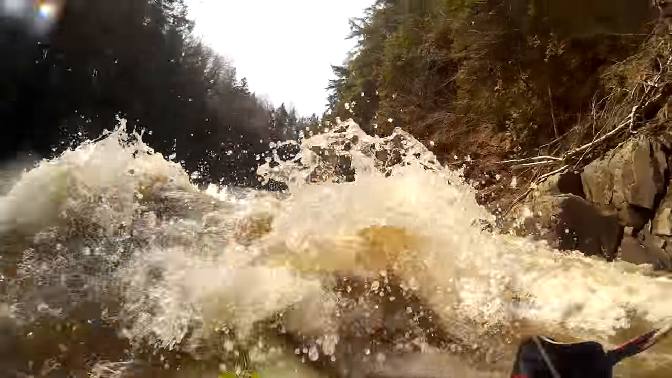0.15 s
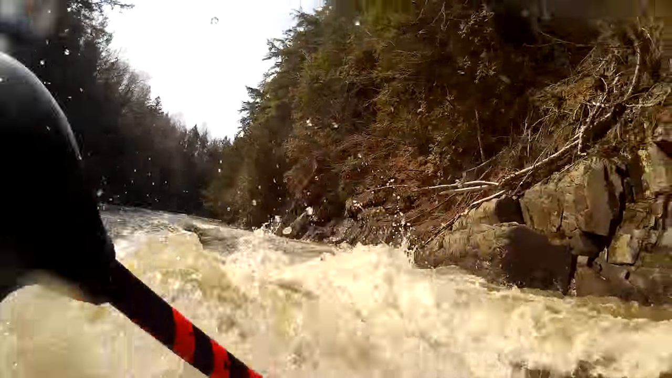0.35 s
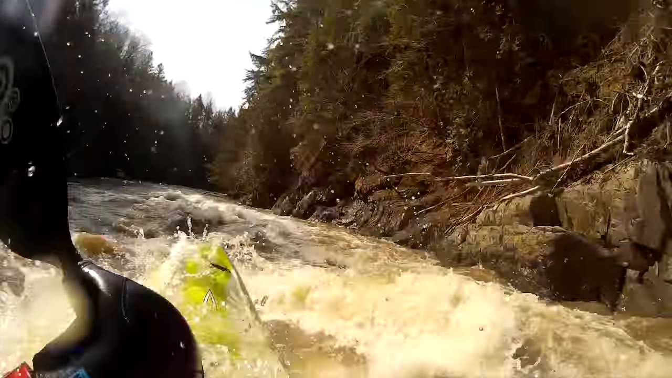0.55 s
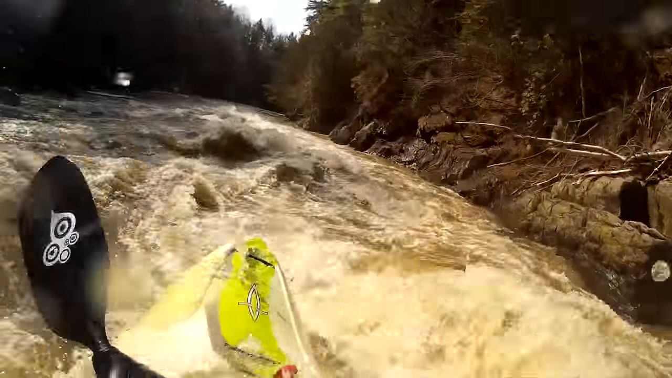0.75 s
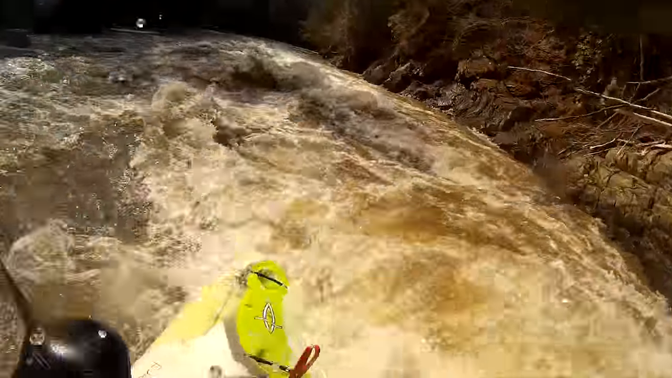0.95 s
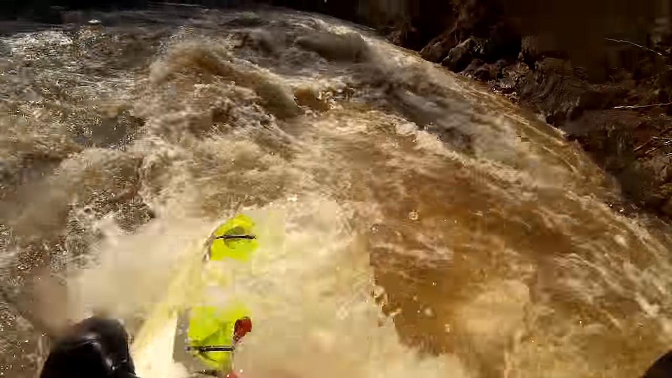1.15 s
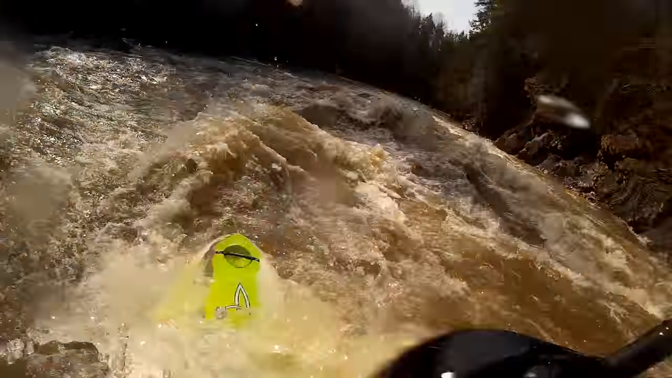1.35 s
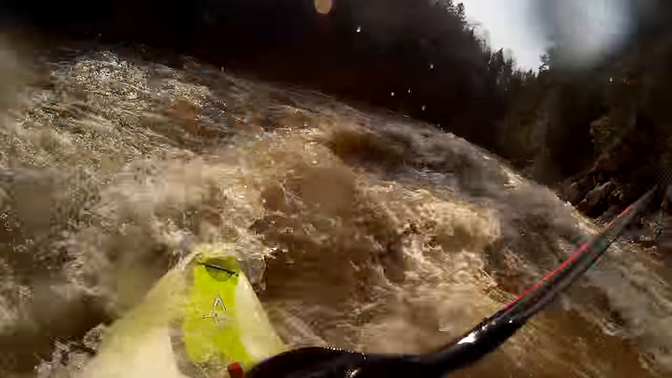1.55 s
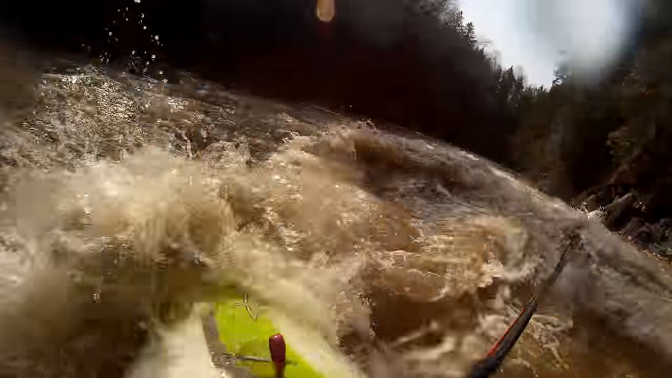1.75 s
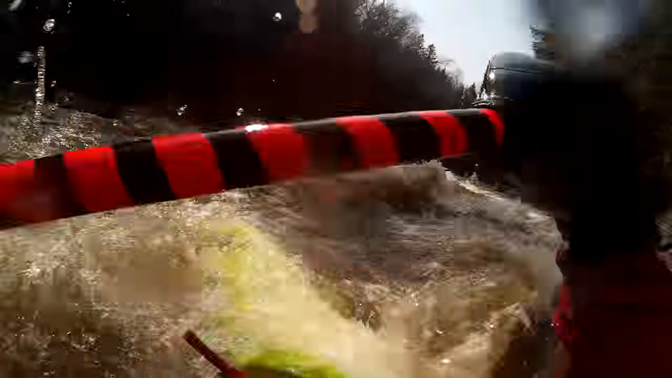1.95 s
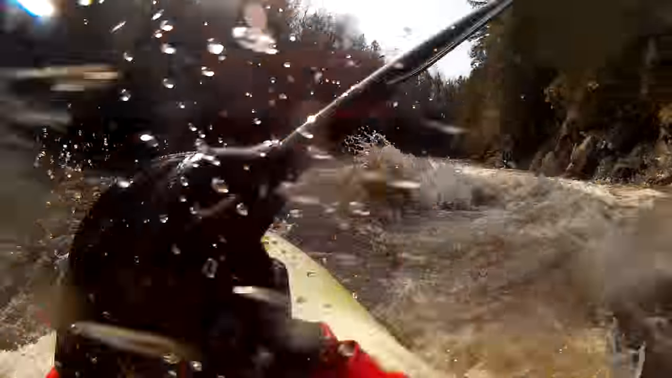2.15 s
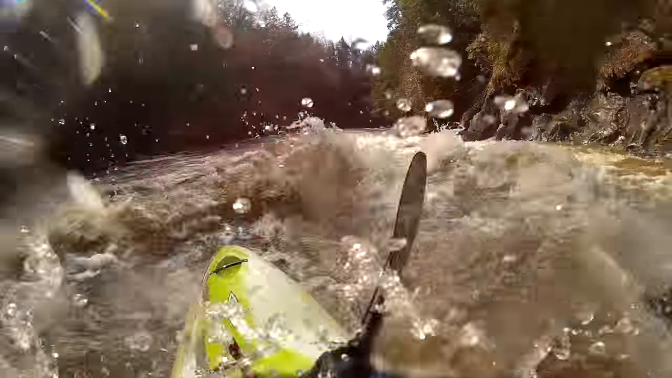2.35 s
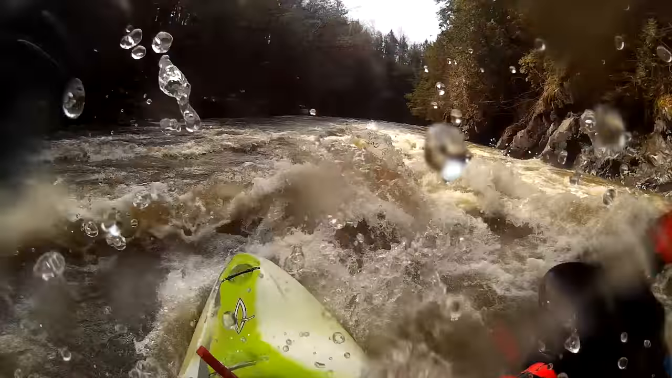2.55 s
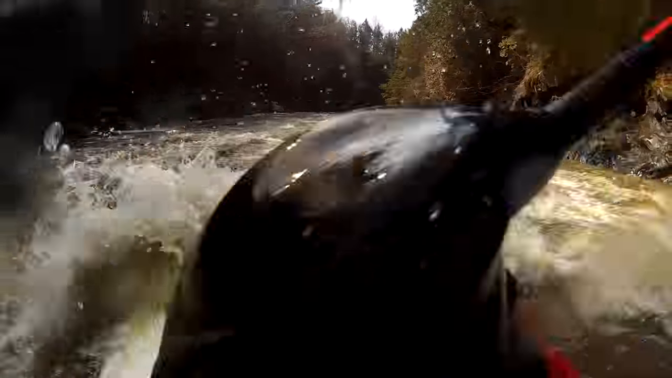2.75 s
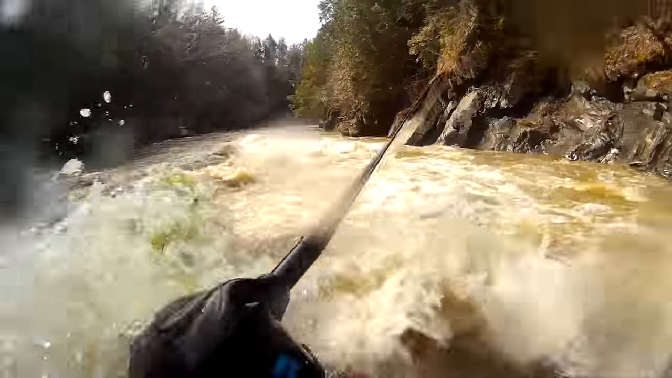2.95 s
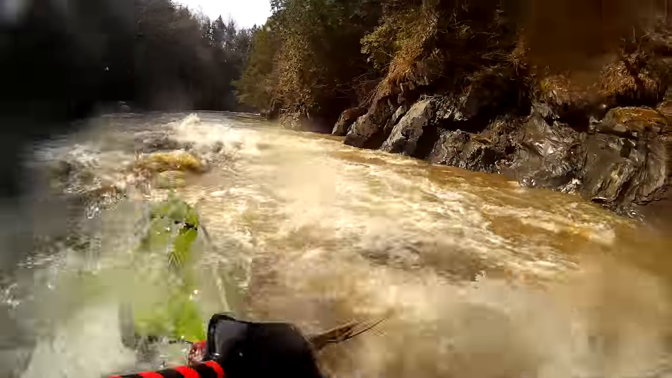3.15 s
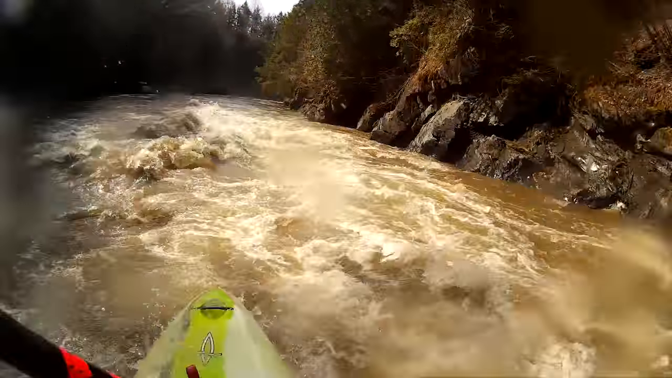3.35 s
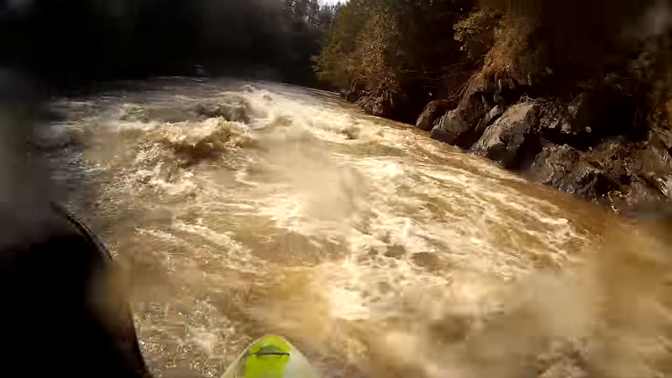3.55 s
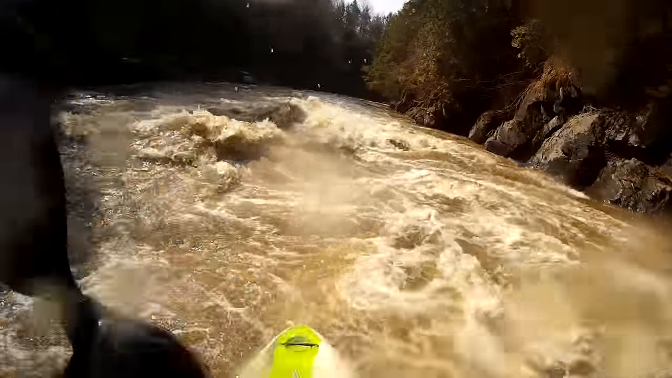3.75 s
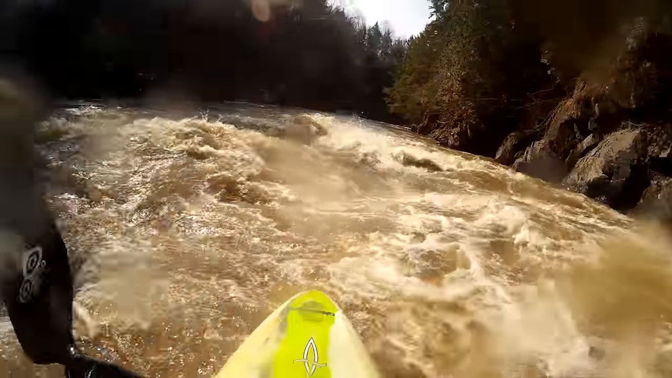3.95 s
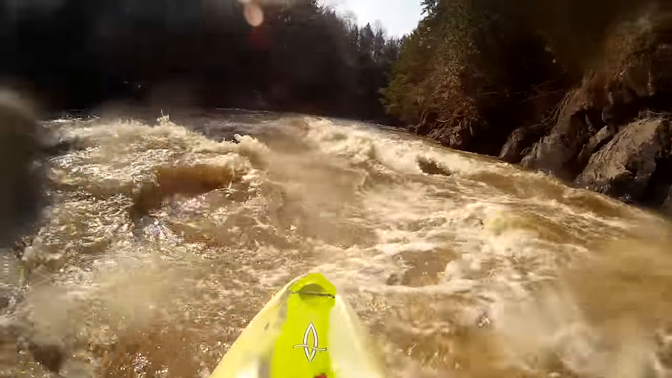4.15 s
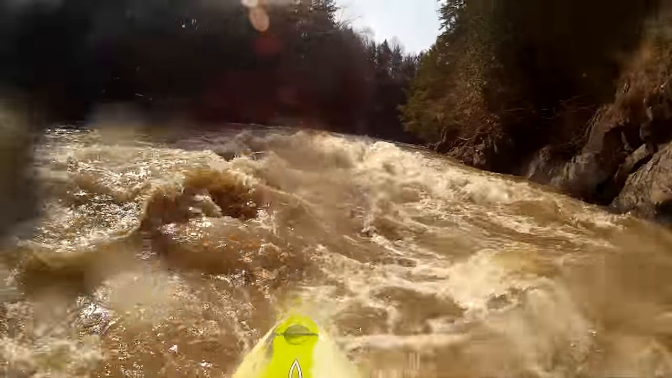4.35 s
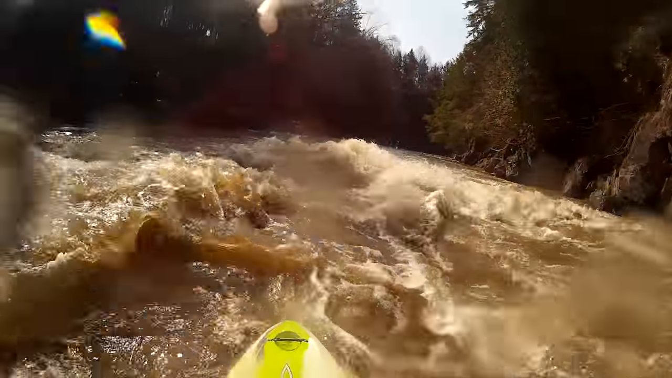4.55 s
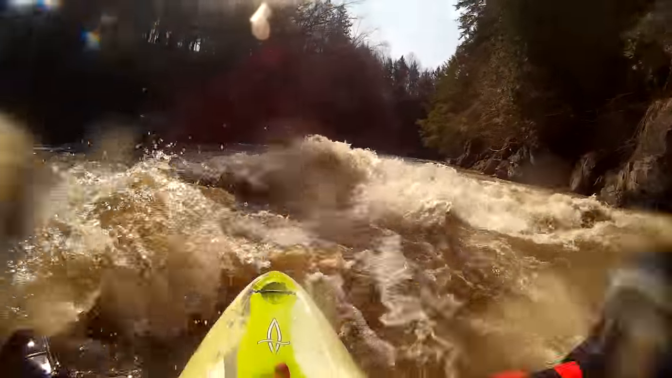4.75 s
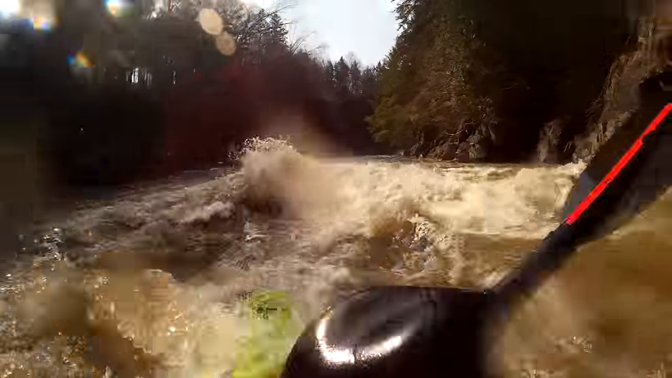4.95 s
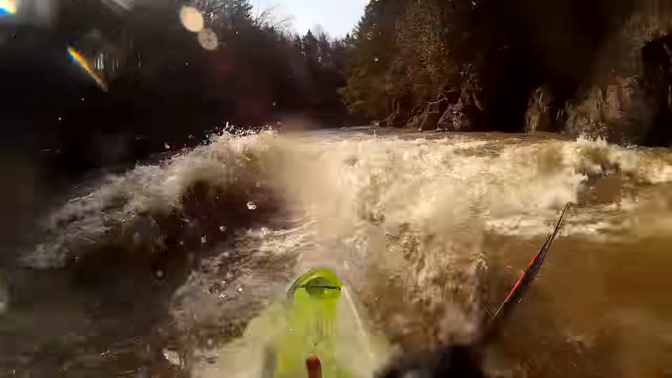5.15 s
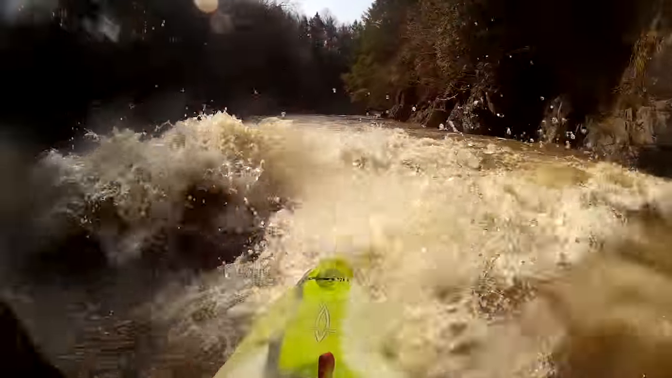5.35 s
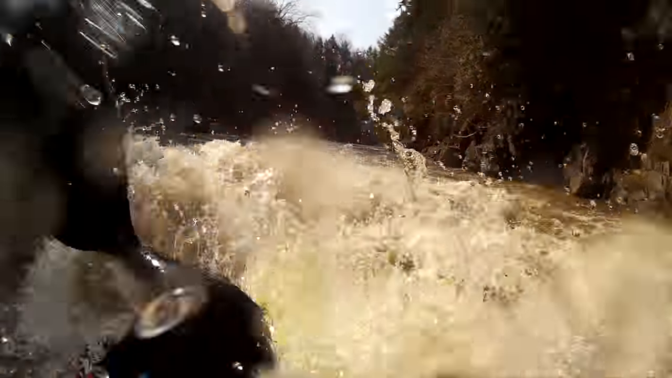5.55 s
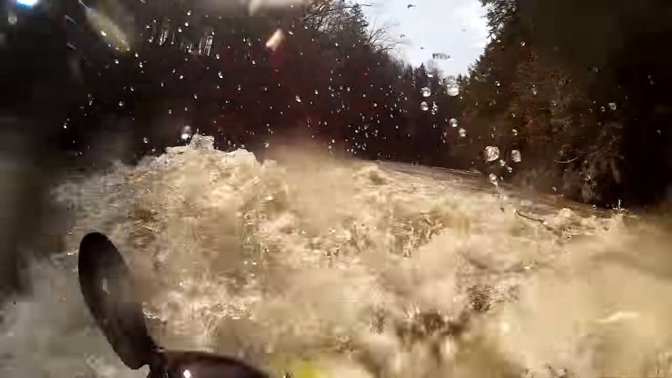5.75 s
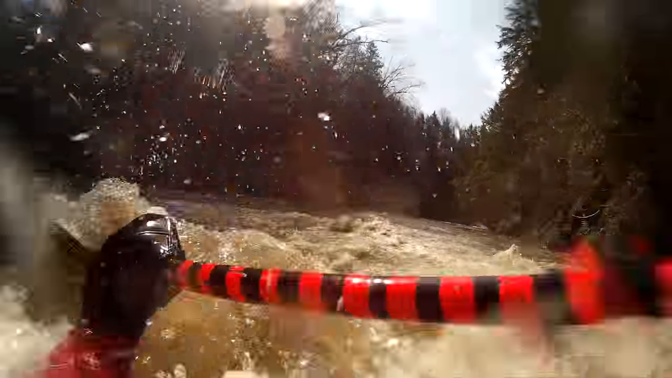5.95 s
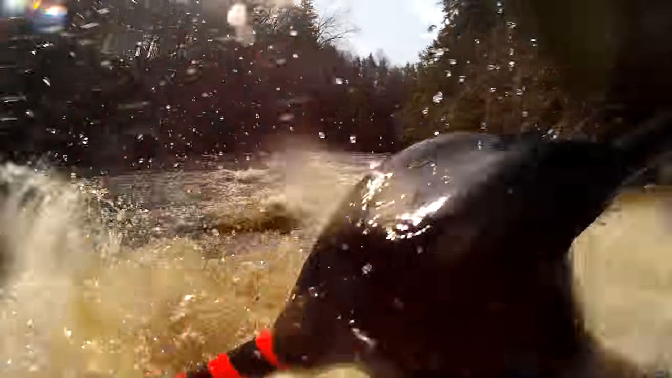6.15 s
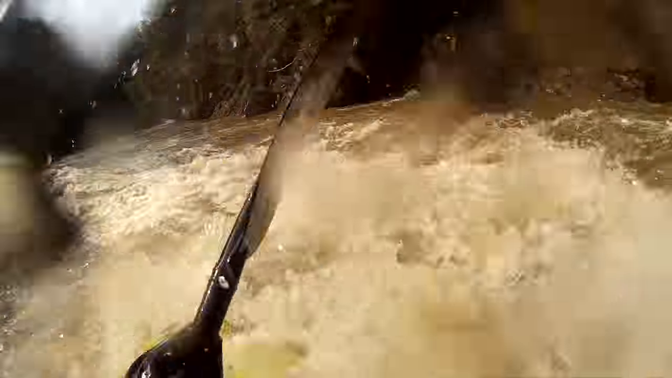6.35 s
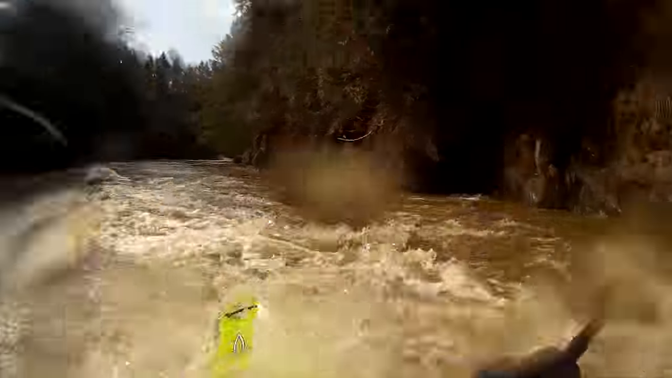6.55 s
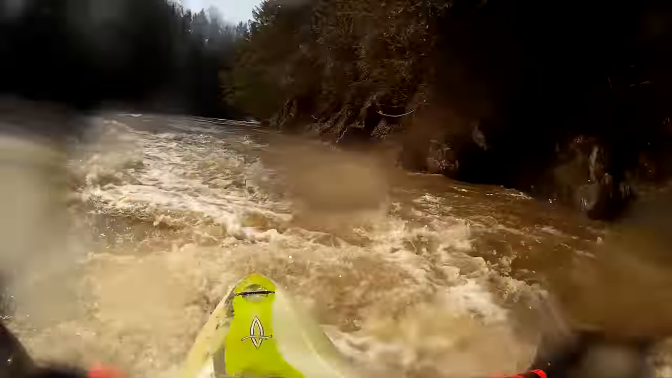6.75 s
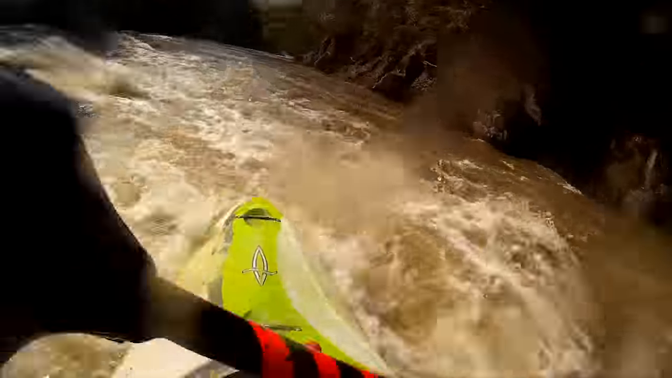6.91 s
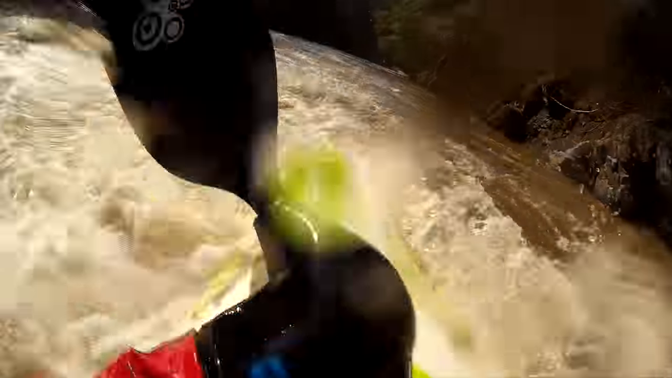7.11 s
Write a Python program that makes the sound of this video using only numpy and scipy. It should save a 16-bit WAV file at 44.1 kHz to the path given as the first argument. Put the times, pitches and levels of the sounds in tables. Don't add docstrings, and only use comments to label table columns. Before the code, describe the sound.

Dull rushing whitewater surges around a kayaker's helmet camera while its plastic case raps, creaks and clunks, and splashes tick and slap against it.

```python
import sys
import numpy as np
from scipy import signal
from scipy.io import wavfile
from scipy.ndimage import uniform_filter1d

SR = 44100
rng = np.random.default_rng(int(sys.argv[2]) if len(sys.argv) > 2 else 0)


def nominal_scale(level):
    x = np.asarray(level, float) / 20
    return 10 ** x


def persist_wave(psi):
    counts = np.round(np.clip(psi, -1, 1) * 32767).astype(np.int16)
    wavfile.write(sys.argv[1], SR, np.atleast_2d(counts).T)


N = 321048


def evened(x):
    return x / np.sqrt(np.mean(x ** 2) + 1e-20)


def read(points, hz):
    f, value = np.transpose(points)
    return np.interp(np.log(hz + 1), np.log(f + 1), value)


def add(mix, start_s, sound):
    part = mix[round(start_s * SR):][:len(sound)]
    part += sound[:len(part)]


def muffled(x, hz):
    return signal.sosfilt(signal.butter(4, min(hz, 9000), fs=SR, output="sos"), x)


def passed(x, low_hz, high_hz):
    return signal.sosfilt(signal.butter(2, [low_hz, high_hz], "band", fs=SR, output="sos"), x)


def shell_ring(t, modes):
    return sum(nominal_scale(db) * np.exp(-np.pi * width_hz * t) * np.sin(2 * np.pi * hz * t)
               for hz, width_hz, db in modes)


def noise_of(points):
    return lambda hz: nominal_scale(read(points, hz))


def water(colour, patchy_db, flicker_db, size=1024):
    hop = size // 4
    frames, hz = N // hop + 5, np.fft.rfftfreq(size, 1 / SR)
    real, imag, patches = rng.standard_normal((frames, len(hz), 3)).T
    patches = uniform_filter1d(patches, size=10, axis=0)
    patches = evened(uniform_filter1d(patches, size=8, axis=1))
    flicker = evened(uniform_filter1d(rng.standard_normal(frames), size=4))
    level = nominal_scale(patchy_db * patches + flicker_db * flicker)
    z = (real + 1j * imag) * colour(hz)[:, None] * level
    return evened(signal.istft(z, nperseg=size, noverlap=size - hop)[1][:N])


# (frequency [Hz], density [dB per Hz])
HISS = [(2000, -14), (5000, 2.5), (10000, 2), (16000, 0.5)]


def preamp_hiss():
    return nominal_scale(-73.5) * water(noise_of(HISS), patchy_db=0.1, flicker_db=1.0)


# (frequency [Hz], density [dB per Hz])
SHELL = [(90, -18), (150, -2.5), (250, -2.5), (650, -8.5), (900, -7.5), (1350, -18.5), (1900, -19.5),
         (2500, -22.5), (3100, -37), (3400, -54.5)]
# (frequency [Hz], width [Hz], level [dB])
SHELL_MODES = [(1176, 59, -5.5), (1500, 66, -6), (1220, 32, -19.5), (1707, 147, -12.5), (2122, 112, -14)]


def through_shell(hz):
    peaks = sum(nominal_scale(2 * db) / (1 + (2 * (hz - f) / width_hz) ** 2) for f, width_hz, db in SHELL_MODES)
    peaks = peaks * nominal_scale(2 * read([(2300, 2), (3200, -8.5)], hz))
    return np.sqrt(nominal_scale(2 * read(SHELL, hz)) + peaks)


# (time [s], roar level [dB])
FLOW = [(0.0, -59.5), (0.18, -55), (0.75, -56.5), (1.0, -58.5), (1.65, -57), (2.21, -55.5), (2.3, -63.5),
        (2.5, -60), (3.2, -60.5), (3.75, -64), (4.12, -63), (4.4, -62), (4.9, -60.5), (5.6, -56.5),
        (5.92, -54), (6.4, -53), (6.6, -59), (7.28, -62)]
# (time [s], lift [dB], rise and fall [s])
SPLASHES = [(.3, 3.5, 0.074), (.46, 6.5, 0.077), (.55, 8.5, .08), (1.17, 3, 0.14), (1.37, 1, 0.062),
            (1.7, 2.5, .09), (2.04, 5.5, 0.042), (2.5, 3.5, 0.42), (3.18, 2, 0.26), (4.98, 2.5, 0.12),
            (5.36, 0.5, 0.17), (5.76, 2.5, 0.17), (6.06, 2.5, 0.14), (6.19, 2, 0.11), (6.72, 2.5, 0.04),
            (7.03, 2, 0.12)]
# (time [s], rumble level [dB])
LURCHES = [(.3, -59), (.5, -46.5), (.64, -43), (1.14, -44), (1.4, -53), (1.56, -47), (1.7, -49),
           (1.97, -44.5), (2.1, -39), (2.22, -41), (2.6, -56), (3.08, -50.5), (3.5, -58), (3.94, -59),
           (5.15, -51.5), (5.55, -48), (5.88, -48.5), (6.19, -49), (6.4, -45), (6.66, -44.5), (7.1, -51)]
ROAR_SHARE, SPRAY_SHARE, SPRAY_DB = 0.94, 1.27, -13.5
LURCH_S, REST_DB = 0.067, -1


def swell():
    t = np.arange(0, N + 64, 64) / SR
    flow_db = np.interp(t, *np.transpose(FLOW))
    lift_db = sum(db * np.maximum(1 - abs(t - s) / span_s, 0) for s, db, span_s in SPLASHES)
    lurches = sum(nominal_scale(db) * np.exp(-.5 * ((t - s) / LURCH_S) ** 2) for s, db in LURCHES)
    roar_db = flow_db + ROAR_SHARE * lift_db
    spray_db = flow_db + SPRAY_DB + SPRAY_SHARE * lift_db
    rocking_db = 20 * np.log10(nominal_scale(flow_db + REST_DB) + lurches)
    return [np.interp(np.arange(N) / SR, t, db) for db in (roar_db, spray_db, rocking_db)]


# (frequency [Hz], density [dB per Hz])
SPRAY = [(2600, -5), (3300, -2.5), (3800, 6), (4300, 0.5), (5000, -12), (6000, -15), (7000, -41)]
# (frequency [Hz], density [dB per Hz])
FIZZ = [(4000, -21), (5500, 2.5), (7000, 0.5), (8300, 2), (10500, -7), (12500, -30)]
# (frequency [Hz], density [dB per Hz])
ROCKING = [(12, -27.5), (25, 13.5), (55, -16.5), (110, -3.5), (160, -12.5), (300, -64.5)]


def river():
    roar_db, spray_db, rocking_db = swell()
    roar = water(through_shell, patchy_db=1.5, flicker_db=0.65, size=512)
    deep = signal.oaconvolve(roar, signal.firwin(201, 1000, fs=SR), "same")
    far_db = -54.5 + 0.97 * (roar_db + 59.5)
    roar = nominal_scale(far_db) * deep + nominal_scale(roar_db + 10.5) * (roar - deep)
    spray = nominal_scale(spray_db + 2.6) * water(noise_of(SPRAY), patchy_db=0.5, flicker_db=-0.5, size=256)
    fizz_db = -73.5 + 1.1 * (spray_db + 61)
    fizz = nominal_scale(fizz_db) * water(noise_of(FIZZ), patchy_db=1.0, flicker_db=-2.5, size=256)
    rocking = nominal_scale(rocking_db - 1.5) * water(noise_of(ROCKING), patchy_db=1.5, flicker_db=1.2, size=2048)
    bursts = np.minimum(rng.exponential(1, N // 64 + 1), 2)
    crackle = evened(nominal_scale(3.0 * np.repeat(bursts, 64)[:N]))
    return roar + uniform_filter1d(crackle, size=48) * (spray + fizz) + rocking


# (time [s], tick peak [dB], bubble level [dB], bubble frequency [Hz])
DROPS = [(0.322, -36.5, -42.5, 3700), (.528, -56, -54, 8500), (1.173, -39, -44.5, 3750),
         (1.228, -42, -46, 3700), (2.031, -50, -61, 6000), (2.037, -40.5, -62, 8200),
         (2.136, -36, -58, 7460), (2.139, -29, -65, 4700), (2.2068, -44, -50, 8000),
         (2.221, -35.5, -47, 4800), (2.224, -45, -56, 8300), (2.501, -64, -41, 2370),
         (2.513, -64, -39.5, 2300), (3.214, -44, -64, 6000), (5.605, -36, -45.5, 4320),
         (5.607, -48, -68, 7480), (5.934, -42, -46, 3660), (6.1762, -39, -56, 5040),
         (6.1753, -30.5, -24.5, 1920), (6.223, -35.5, -66, 4030), (6.263, -39, -55, 6170),
         (6.2665, -42, -43, 4750), (6.269, -43, -62, 7100), (6.272, -54, -58, 8460),
         (6.351, -43, -60, 7450), (2.2035, -40, -54, 3300), (2.207, -45, -54, 4300),
         (2.2225, -44, -52, 3700), (2.1415, -46, -57, 5500), (.5278, -42, -50, 4000),
         (.4414, -52, -50, 3710), (.128, -56, -53, 3930), (1.204, -50, -53, 3900), (5.6765, -44, -58, 3800),
         (5.65, -50, -60, 3800), (6.2085, -46, -56, 4200), (6.1775, -44, -50, 2700), (3.13, -60, -57, 4170),
         (1.6616, -58, -56, 3620), (6.127, -56, -50, 3800)]
# (frequency [Hz], width [Hz], level [dB])
PORT = [(1300, 2000, -5), (2180, 280, 26), (3900, 1300, 8.5), (5240, 3600, 0), (8300, 2600, -5)]


def drops():
    out, t = np.zeros(N), np.arange(600) / SR
    noise = rng.standard_normal((len(DROPS), 600))
    for (s, tick_db, bubble_db, hz), puff in zip(DROPS, noise):
        tick = signal.fftconvolve(puff * t * np.exp(-t / 0.0008), shell_ring(t, PORT))[:600]
        age = t / (.0003 + 1.6 / hz)
        bubble = np.sin(2 * np.pi * hz * t * (1 + 8 * t)) * age * np.exp(1 - age)
        add(out, s, nominal_scale(tick_db) * tick / abs(tick).max() + nominal_scale(bubble_db) * bubble)
    return out


# (time [s], peak [dB], push [s], direction [+1 or -1])
SLAPS = [
    (5.6045, -19.5, .00048, 1),
    (6.1758, -26, .00016, 1),
    (.5804, -25, .0003, -1),
    (6.2233, -36, .00016, 1),
    (2.1408, -32, .00018, 1),
    (.5408, -34, .0003, -1),
    (3.2572, -33, .0006, 1),
    (.2742, -33, .0005, -1),
    (.7682, -37, .0005, -1),
]


def slaps():
    out = np.zeros(N)
    for s, db, push_s, direction in SLAPS:
        u = np.arange(600) / SR / push_s
        add(out, s, direction * nominal_scale(db) * muffled((2 - u) * np.sqrt(u) * np.exp(-u / 2), 2300))
    return out


# (time [s], peak [dB], frequency [Hz])
HELMET = [(0.436, -53, 110), (0.855, -36, 105), (1.132, -38, 90), (1.903, -39.5, 89), (2.373, -38.5, 100),
          (2.964, -39.5, 102.6), (3.253, -35.5, 107), (3.452, -38.5, 116), (3.872, -42, 108),
          (4.002, -41.5, 115), (5.007, -40, 99.6), (5.087, -39.5, 117), (5.518, -38, 109),
          (5.597, -49, 124), (6.086, -31, 88.5), (6.151, -31, 100.5), (6.331, -35.5, 92),
          (6.391, -35.5, 107.6), (6.6, -38, 90), (7.012, -29.5, 108)]


def helmet():
    out, t = np.zeros(N), np.arange(5000) / SR
    for s, db, hz in HELMET:
        fading = nominal_scale(db - 60 * t / 0.125)
        add(out, s, fading * np.sin(2 * np.pi * hz * t) * np.minimum(t / 0.0087, 1))
    return out


# (time [s], peak [dB], swing [Hz])
JOLTS = [(0.455, -40, 35), (0.578, -22, 41.5), (0.673, -34, 37.6), (1.05, -49, 30), (1.536, -41, 35),
         (1.585, -30.5, 48.7), (1.994, -27.5, 65), (2.058, -24.5, 43.7), (2.156, -22, 46),
         (2.246, -22, 41.7), (5.975, -32, 34.8), (6.332, -32, 39.7), (6.579, -33, 30.2), (6.546, -24, 36.4)]


def jolts():
    out, t = np.zeros(N), np.arange(5000) / SR
    for s, db, hz in JOLTS:
        dip = (t / 0.0015) ** 2 * np.exp(2 - 2 * t / 0.0022)
        turns = np.maximum(t - .005, 0) * hz
        swing = np.sin(2 * np.pi * 0.63 * turns * (1 + 0.32 * turns)) * np.exp(-(turns / 1.06) ** 4.2)
        add(out, s, nominal_scale(db) * (swing - 0.41 * dip))
    return muffled(out, 540)


# (time [s], peak [dB], ring [Hz])
CLUNKS = [(.35, -42, 676), (1.139, -37, 563), (1.439, -43, 487), (1.581, -40, 579), (1.66, -38, 480),
          (1.758, -41, 619), (1.868, -40, 560), (1.965, -39, 450), (2.018, -39, 544), (2.059, -36, 680),
          (2.136, -38, 950), (2.248, -42, 960), (2.551, -41, 487), (4.006, -46, 630), (5.769, -40, 692),
          (6.086, -36, 490), (6.14, -40, 576), (6.198, -38, 493), (6.34, -36, 565), (6.399, -42, 902),
          (6.436, -36, 624), (6.545, -38, 684), (6.59, -40, 680), (6.997, -37, 450), (.259, -43, 964),
          (.739, -40, 340), (2.86, -44, 130), (3.31, -44, 180), (.756, -44, 300), (.605, -42, 420),
          (3.886, -47, 420), (.59, -36, 100), (.86, -44, 300)]
CLUNK_CYCLES = 2.2


def clunks():
    out, t = np.zeros(N), np.arange(2500) / SR
    for s, db, hz in CLUNKS:
        envelope = np.minimum(t * hz, 1) * np.exp(-t * hz / CLUNK_CYCLES)
        add(out, s, nominal_scale(db) * np.sin(2 * np.pi * hz * t) * envelope)
    return out


# (time [s], peak [dB], ring [Hz])
KNOCKS = [(0.5808, -17.5, 1390), (1.1164, -26, 1300), (1.1401, -17.5, 1240), (1.5837, -22, 1250),
          (1.6588, -24, 1300), (1.8661, -18, 1530), (1.9637, -20.5, 1365), (2.008, -25, 1360),
          (2.0165, -16.5, 1500), (2.139, -24.5, 1180), (2.2495, -23, 1350), (2.5526, -25.5, 1500),
          (3.877, -29.5, 1540), (5.0914, -25, 1460), (5.5223, -25, 1370), (5.6045, -22, 1500),
          (6.002, -23, 1400), (6.0846, -27, 1210), (6.1505, -19, 1540), (6.1754, -17, 1180),
          (6.261, -21.5, 1940), (6.338, -24, 1210), (6.3607, -21, 1245), (6.422, -21.5, 1290),
          (6.4378, -22, 1480), (6.4607, -28, 1270), (6.4793, -21.5, 1320), (6.5495, -23, 1220),
          (6.994, -25, 1500), (5.017, -30, 1300),
          (1.65, -24.5, 1410), (3.016, -29, 1450), (3.299, -28, 1450), (6.207, -24, 1340),
               (7.012, -20.5, 1519), (1.154, -24, 1300), (2.2095, -30, 1500), (2.094, -30, 1450),
               (6.389, -28, 1600), (6.398, -28, 1450), (6.278, -29, 1400), (6.2875, -28, 1500),
               (1.1245, -28, 1350), (1.218, -32, 1600), (6.998, -24, 1400), (3.286, -29, 1450),
               (.352, -32, 1500), (.456, -30, 1600), (.0955, -31, 1550), (.187, -33, 1250),
               (5.775, -29, 1500), (6.0865, -25, 1350), (4.007, -35, 1500), (2.4285, -35, 1400),
               (5.945, -30, 1400), (.7345, -33, 1500), (1.457, -33, 1500), (6.835, -31, 1450),
               (6.701, -30, 1500), (5.171, -30, 1400), (5.258, -32, 1450), (2.873, -30, 1400),
               (3.09, -33, 1500), (6.032, -30, 1500)]
# (frequency [Hz], width [Hz], level [dB])
RINGING = [(1180, 600, 26), (1480, 510, 24.5), (1840, 290, -1)]


def knocks():
    out, t = np.zeros(N), np.arange(1200) / SR
    raps = KNOCKS
    shape = (len(raps), 1200)
    rattle = rng.standard_normal(shape) * (rng.random(shape) < .02)
    for (s, db, hz), bounces in zip(raps, rattle):
        blow = (t == 0) + .25 * bounces * np.exp(-t / .004)
        ring = shell_ring(t, [(hz, 175, 0)]) + 0.31 * shell_ring(t, RINGING)
        rap = signal.fftconvolve(blow, ring * np.minimum(t / 0.0036, 1))[:1200]
        rap = muffled(rap, 1.28 * hz)
        add(out, s, -nominal_scale(db - 6.0) * rap / abs(rap).max())
    return out


# (time [s], length [s], level [dB], slip rate [Hz])
GROANS = [(0.101, .028, -46.5, 234), (0.139, .029, -45, 310), (1.371, 0.051, -47.5, 217),
          (1.65, 0.021, -39.5, 340), (1.858, 0.018, -47, 285), (1.994, 0.035, -45.5, 253),
          (2.551, 0.029, -43, 240), (2.717, 0.029, -54.5, 193), (3.016, .031, -50.5, 177),
          (3.066, 0.026, -47.5, 256), (5.004, 0.024, -50.5, 340), (5.164, 0.02, -46, 225),
          (5.255, 0.028, -50.5, 148), (6.395, 0.027, -54, 174), (6.813, 0.05, -44.5, 215),
          (7.214, 0.03, -48, 232)]
# (time [s], length [s], level [dB], slip rate [Hz])
RASPS = [(.428, 0.027, -41, 220), (.857, 0.024, -52, 110), (1.124, 0.021, -46, 146),
         (2.136, 0.015, -43, 260), (2.858, .027, -50, 196), (3.2655, 0.041, -42.5, 200),
         (3.455, 0.04, -46, 200), (5.446, 0.032, -46.5, 195), (5.923, 0.042, -45.5, 250),
         (6.041, .026, -47, 273), (6.277, 0.035, -45.5, 174), (6.543, .02, -42, 196),
         (6.703, 0.024, -47.5, 184), (6.992, 0.022, -43.5, 224)]
# (time [s], level [dB], slip rate [Hz], shell ring over thud [dB])
SQUEAKS = [(.185, -48.5, 146, -9), (.268, -46.5, 260, 4), (0.537, -45.5, 216, 0), (.642, -44, 223, -6),
           (.673, -47, 220, 1.5), (.738, -43, 290, -1.5), (1.022, -50.5, 263, -5), (1.078, -51, 325, 0),
           (1.215, -50.5, 265, -9), (1.442, -44, 270, -1), (1.486, -42.5, 265, -9), (1.613, -43, 146, -3.5),
           (1.765, -45.5, 303, -0.5), (1.811, -43.5, 210, -2), (1.961, -40.5, 252, -13),
           (2.322, -53, 340, -7), (2.453, -48.5, 216, 2), (2.603, -51, 320, 4.5), (3.224, -52, 315, -18),
           (3.994, -54.5, 85, 2.5), (5.114, -46, 283, -4), (5.574, -50.5, 210, -6), (5.769, -40, 254, -2.5),
           (6.016, -45, 206, -3), (6.141, -45, 190, -3), (6.478, -49.5, 270, -14), (6.895, -48.5, 294, -4),
           (7.155, -48.5, 246, -15)]
# (time [s], level [dB], shell ring over thud [dB])
SNAPS = [(.345, -47.5, 1), (.506, -38.5, -7), (.579, -35, -0.5), (.604, -42, -14), (.839, -49, -1),
         (1.255, -50.5, -3), (1.584, -41, 0), (1.711, -47, -3), (1.915, -41, 1), (2.058, -40.5, 2),
         (2.355, -43.5, -2.5), (2.394, -46.5, -6), (2.426, -45.5, -5), (2.698, -45.5, 3), (2.971, -43.5, 0),
         (3.337, -47.5, -4), (3.877, -42.5, 3.5), (5.091, -41.5, 3), (5.324, -48.5, -19), (5.497, -43, -15),
         (5.632, -42.5, 1), (5.884, -45, -17), (6.084, -39, 2), (6.174, -47.5, 5), (6.199, -44.5, 3),
         (6.23, -43, -3), (6.341, -40.5, -2), (6.434, -44.5, 8.5), (6.459, -45.5, -4), (6.61, -46.5, 1)]
GROAN_RING_DB, RASP_RING_DB = -3, 2.5
RING_SLOPE = -0.85
SQUEAK_S, SNAP_S, SNAP_HZ, SNAP_SPREAD = .017, .0068, 240.7, .15


def strains():
    rows = []
    for table, ring_db in ((GROANS, GROAN_RING_DB), (RASPS, RASP_RING_DB)):
        rows += [(s, length_s, db, hz, ring_db + RING_SLOPE * (db + 47)) for s, length_s, db, hz in table]
    rows += [(s, SQUEAK_S, db, hz, ring_db) for s, db, hz, ring_db in SQUEAKS]
    rates_hz = SNAP_HZ * (1 + SNAP_SPREAD * rng.uniform(-1.16, 1, len(SNAPS)))
    return rows + [(s, SNAP_S, db, hz, ring_db) for (s, db, ring_db), hz in zip(SNAPS, rates_hz)]


# (frequency [Hz], width [Hz], level [dB])
THUD = [(110, 11.4, -11), (323, 232, 12), (610, 192, 4)]


def creaks():
    out, rings, t = np.zeros(N), np.zeros(N), np.arange(3000) / SR
    rows = strains()
    chance = np.clip(rng.standard_normal((len(rows), 3, 24)), -1.5, 1.5)
    for (s, length_s, db, rate_hz, ring_db), (late, size, bright) in zip(rows, chance):
        even_s = np.arange(24) / rate_hz
        use = even_s < max(length_s - .003, 1e-4)
        age = even_s / length_s
        slip_s = even_s * (1 + 0.042 * late[-1] * age + .08 * age ** 2)
        slip_s = slip_s + 0.065 * late / rate_hz
        place = np.clip((slip_s[use] * SR).astype(int), 0, 2999)
        fade_db = -4.5 * age[use] ** 2
        fade_db = fade_db - 1.5 * (even_s[use] == 0) * (length_s > .01)
        force = nominal_scale(db + fade_db + 2 * size[use]) * np.sign(size[-1]) / np.sqrt(rate_hz)
        arm = shell_ring(t, [(rate_hz, 65, -4)])
        thud = passed(muffled(shell_ring(t, THUD) + arm, 830), 70, 2000)
        thud *= nominal_scale(4.6) / np.sqrt(np.sum(thud ** 2) / SR)
        add(out, s, signal.fftconvolve(np.bincount(place, force), thud))
        add(rings, s, np.bincount(place, force * nominal_scale(ring_db + 3 * bright[use])))
    ring = passed(muffled(shell_ring(t, RINGING), 1660), 1148, 1570)
    ring_rms = np.sqrt(np.sum(ring ** 2) / SR)
    return out - nominal_scale(-0.7) * signal.oaconvolve(rings, ring)[:N] / ring_rms


def scene():
    return (river() + drops() + slaps() + helmet() + jolts() + clunks() + knocks() + creaks())[None]


# (time [s], length [s], lower edge [Hz])
DULLED = [(.59, .008, 15000), (1.655, .01, 14500), (1.78, .008, 15000), (1.87, .008, 15000),
          (2.018, .014, 15000), (2.142, .006, 14500), (3.258, .012, 12800), (3.275, .014, 15000),
          (3.878, .01, 13000), (5.094, .01, 13000), (5.605, .014, 15000), (6.178, .01, 14800),
          (6.405, .01, 12800), (6.455, .014, 12800), (6.44, .06, 15000), (6.49, .008, 13200),
          (6.548, .008, 12800), (6.99, .008, 14500)]


def dulled(x):
    out = x.copy()
    for s, length_s, hz in DULLED:
        a, b = round((s - length_s / 2) * SR) - 200, round((s + length_s / 2) * SR) + 200
        top = signal.oaconvolve(out[a:b], signal.firwin(101, hz, pass_zero=False, fs=SR), "same")
        i = np.arange(b - a)
        out[a:b] -= top * np.clip(np.minimum(i, i[::-1]) / 100 - 1, 0, 1)
    return out


def low_pass(x):
    return signal.sosfilt(signal.butter(12, 15710, fs=SR, output="sos"), x)


def record(dry):
    heard = dulled(dry[0] + preamp_hiss())[None]
    mix = signal.oaconvolve(heard, signal.firwin(301, 15700, fs=SR)[None], "same")
    return low_pass(mix)


dry = scene()
out = record(dry)
persist_wave(out)
```